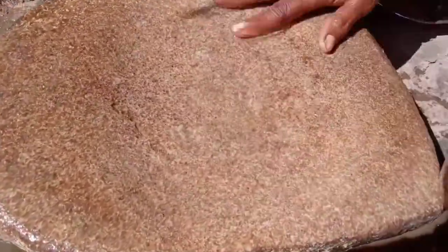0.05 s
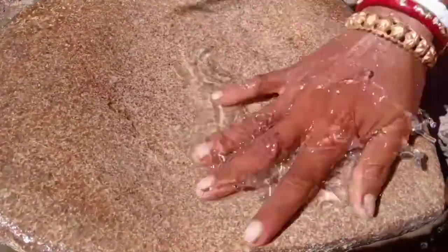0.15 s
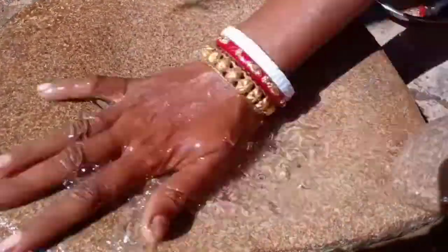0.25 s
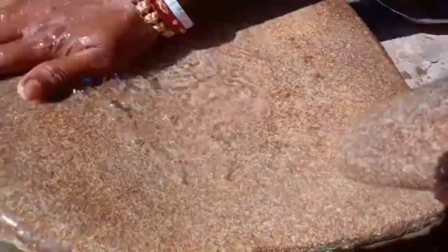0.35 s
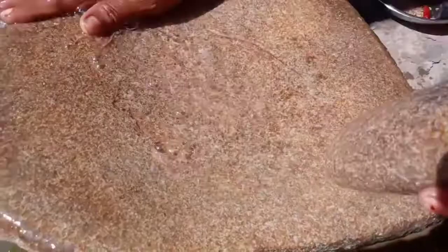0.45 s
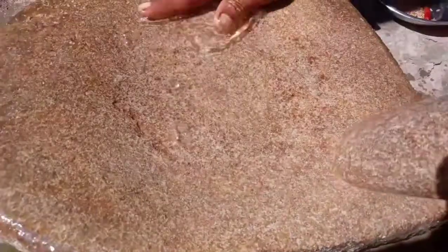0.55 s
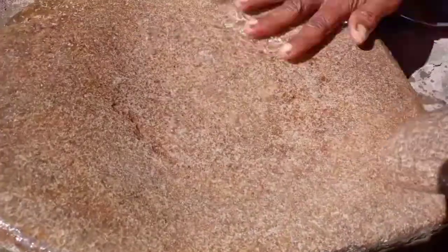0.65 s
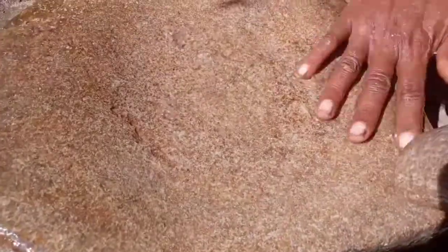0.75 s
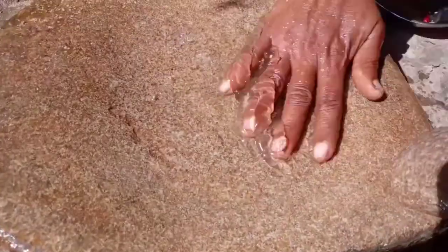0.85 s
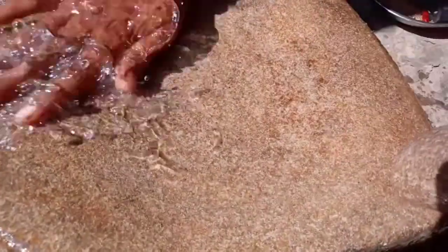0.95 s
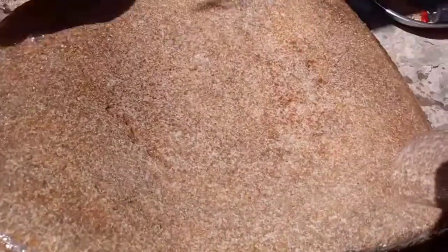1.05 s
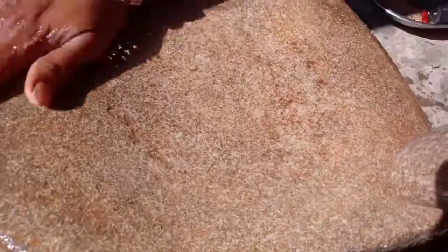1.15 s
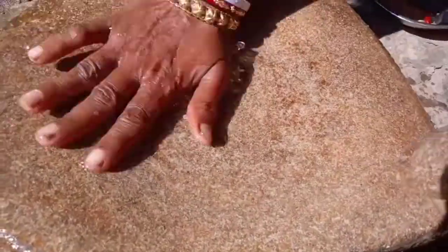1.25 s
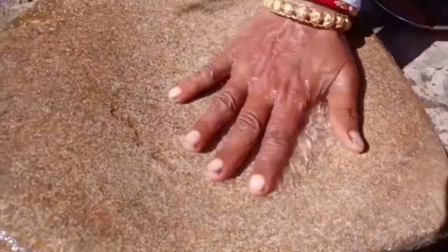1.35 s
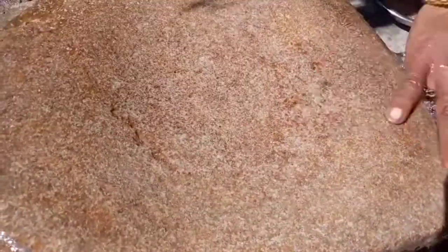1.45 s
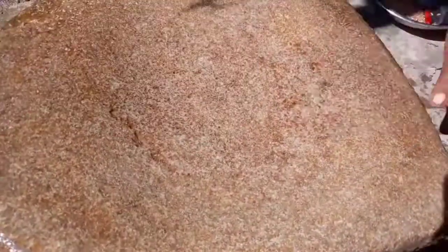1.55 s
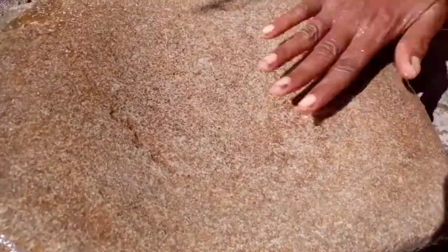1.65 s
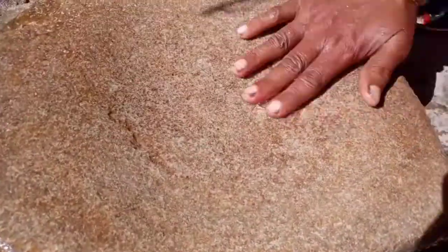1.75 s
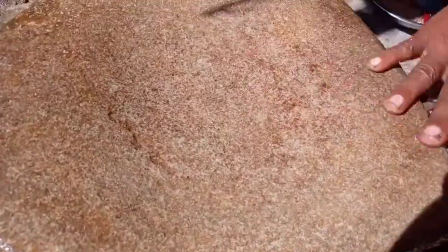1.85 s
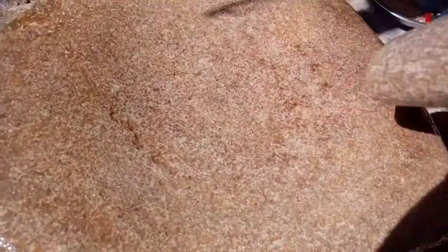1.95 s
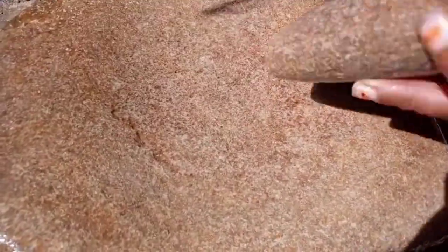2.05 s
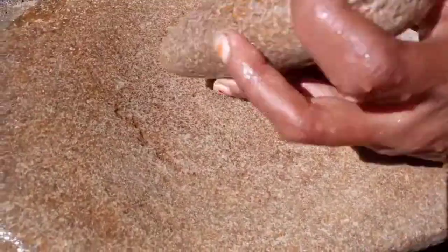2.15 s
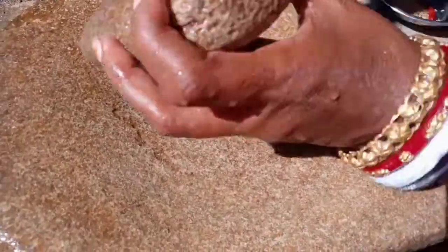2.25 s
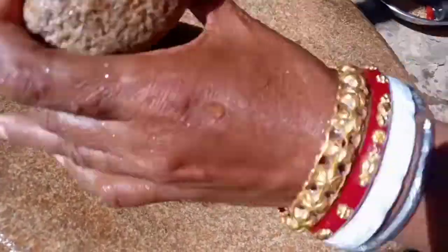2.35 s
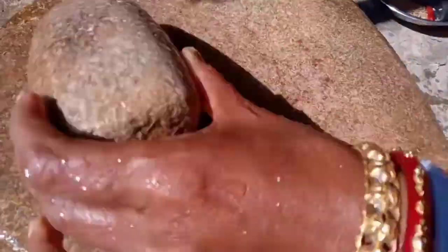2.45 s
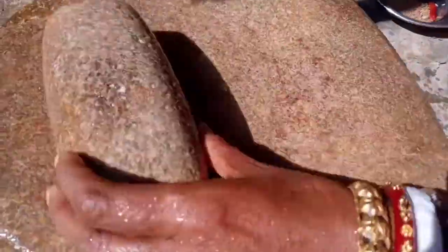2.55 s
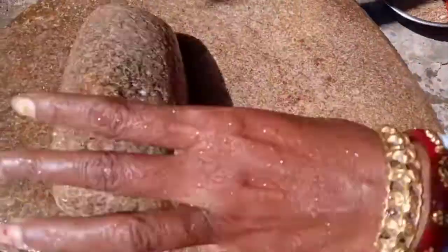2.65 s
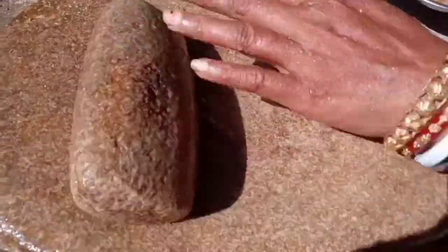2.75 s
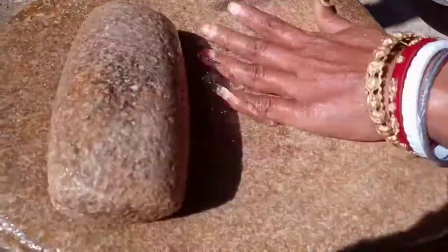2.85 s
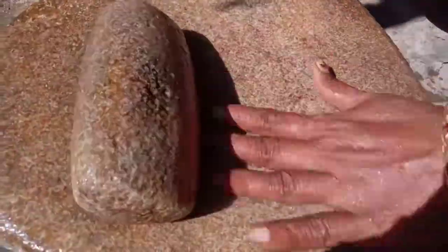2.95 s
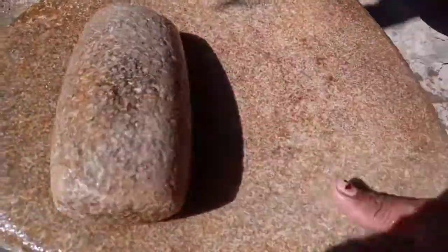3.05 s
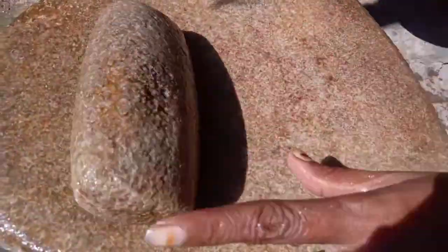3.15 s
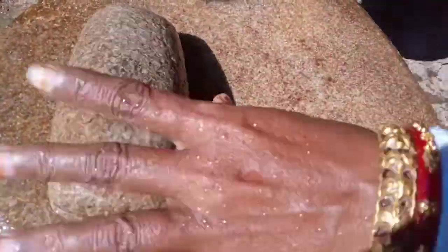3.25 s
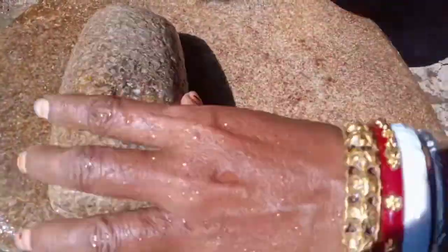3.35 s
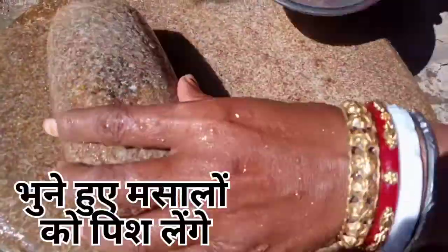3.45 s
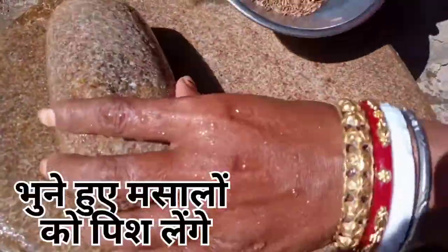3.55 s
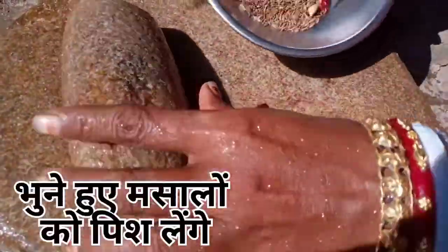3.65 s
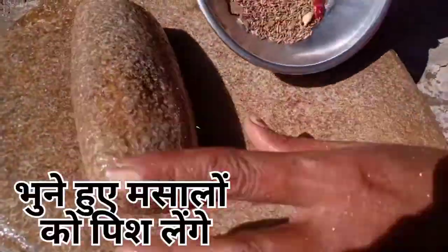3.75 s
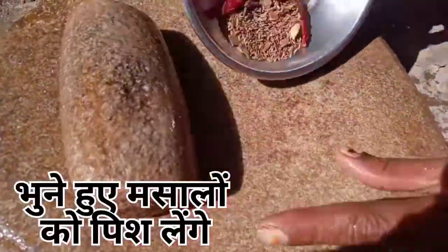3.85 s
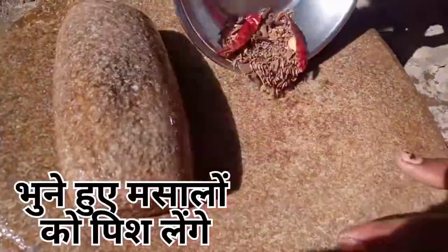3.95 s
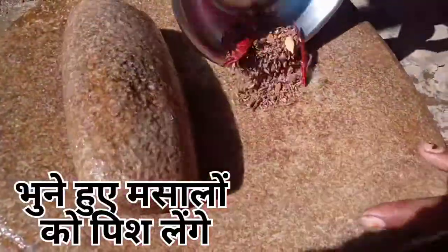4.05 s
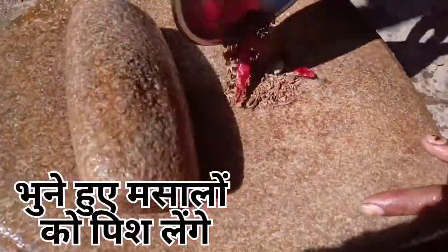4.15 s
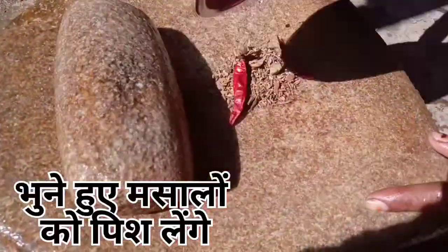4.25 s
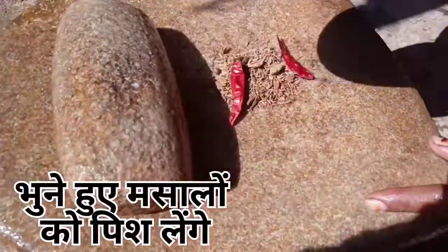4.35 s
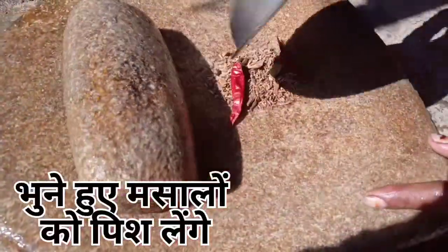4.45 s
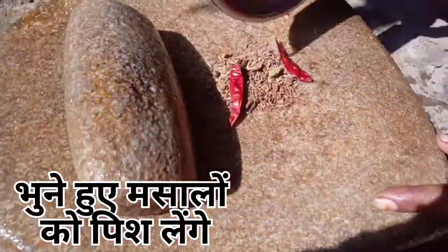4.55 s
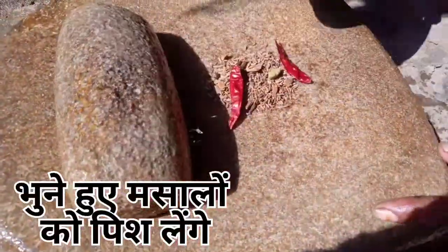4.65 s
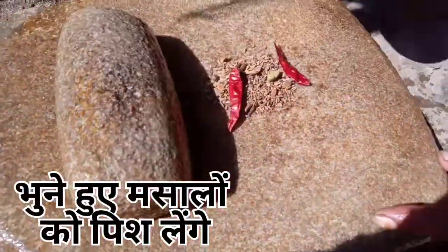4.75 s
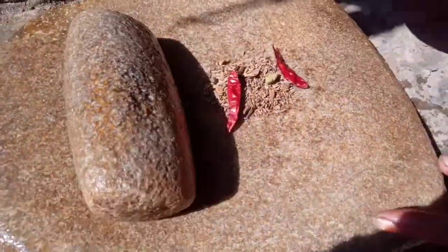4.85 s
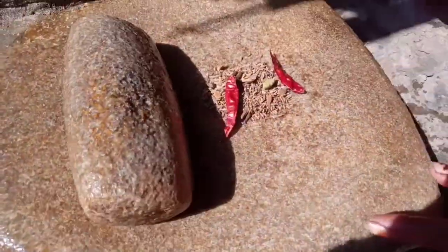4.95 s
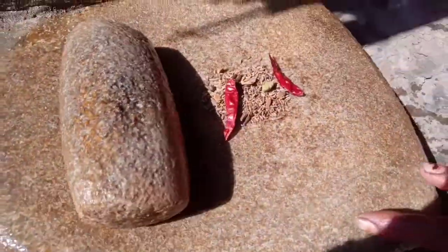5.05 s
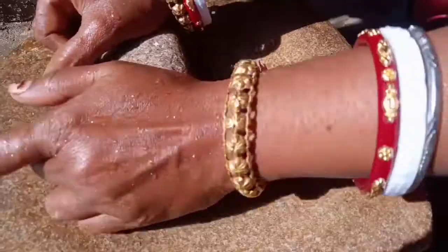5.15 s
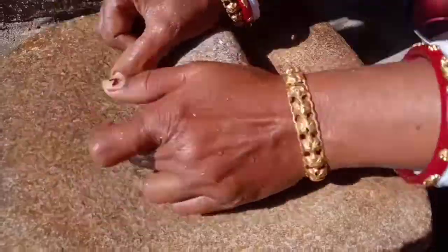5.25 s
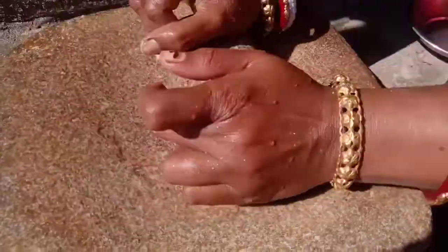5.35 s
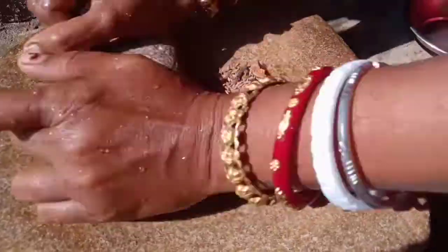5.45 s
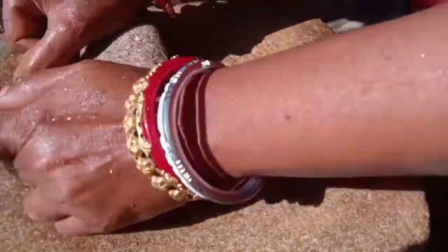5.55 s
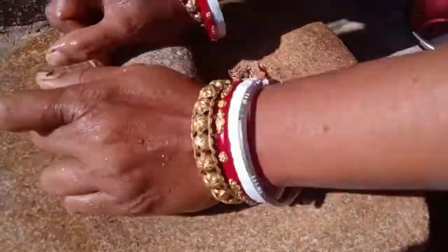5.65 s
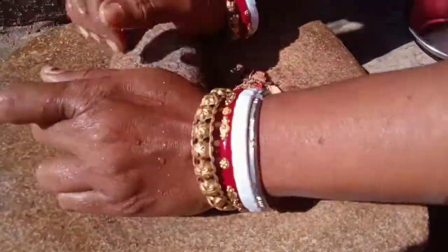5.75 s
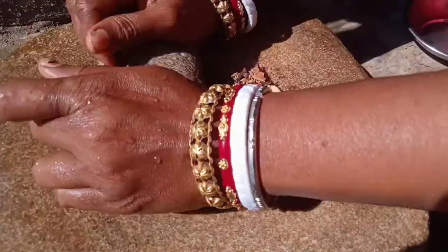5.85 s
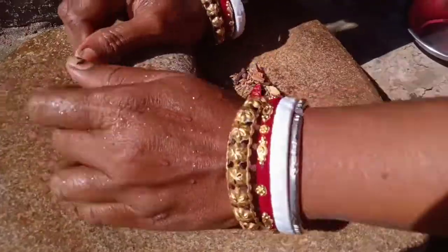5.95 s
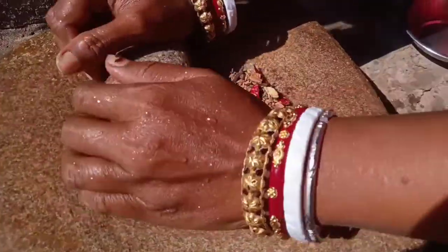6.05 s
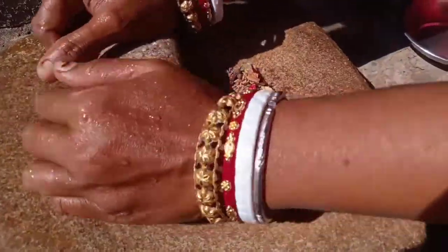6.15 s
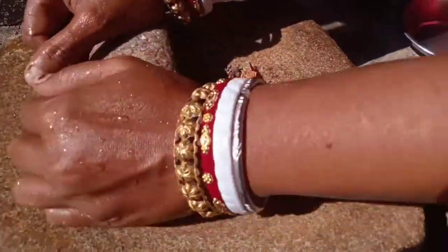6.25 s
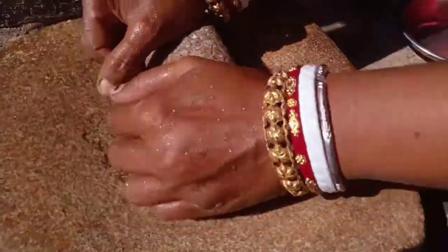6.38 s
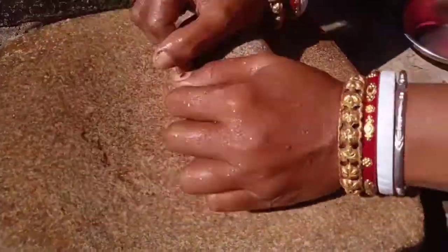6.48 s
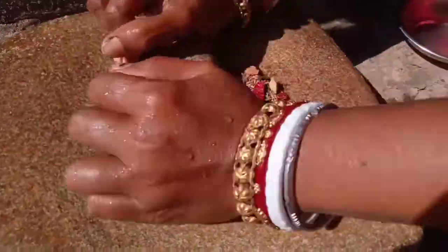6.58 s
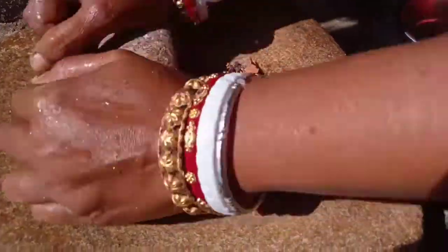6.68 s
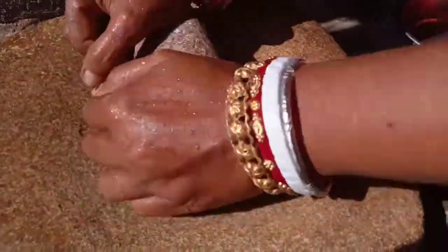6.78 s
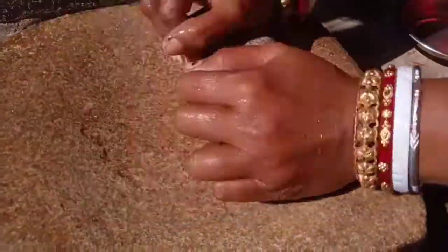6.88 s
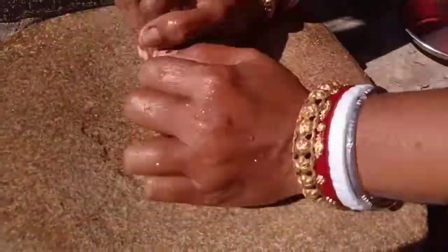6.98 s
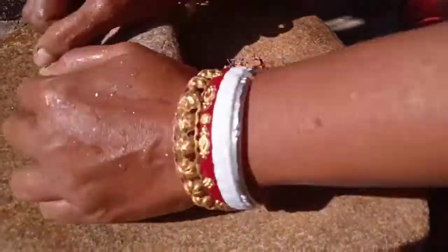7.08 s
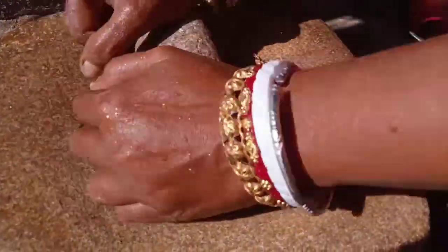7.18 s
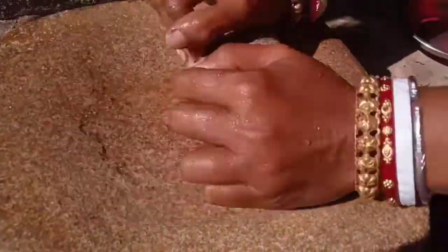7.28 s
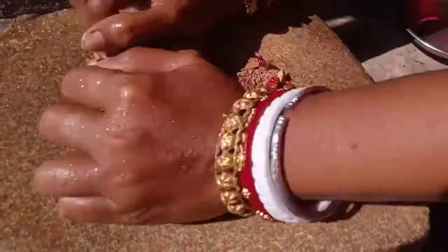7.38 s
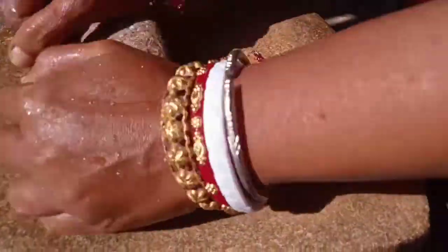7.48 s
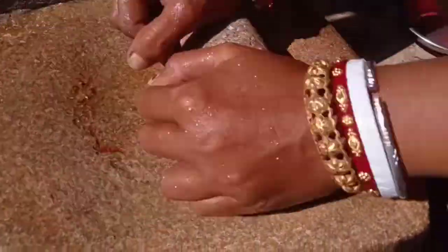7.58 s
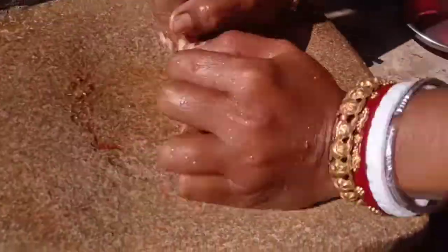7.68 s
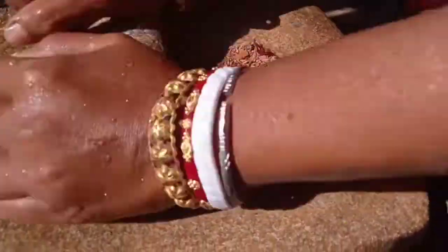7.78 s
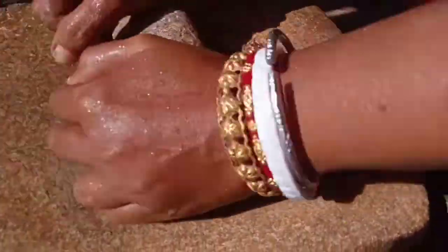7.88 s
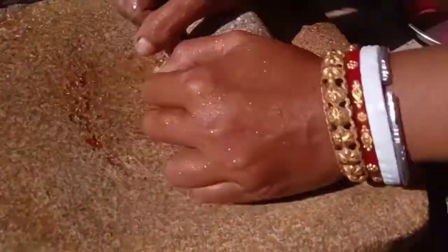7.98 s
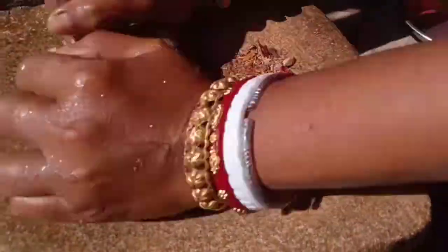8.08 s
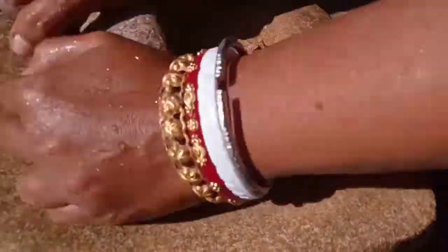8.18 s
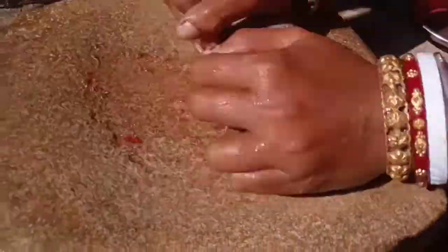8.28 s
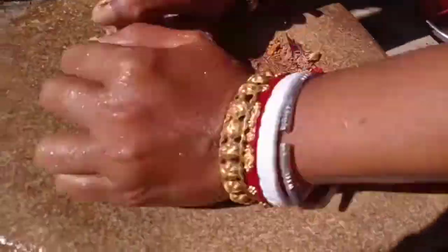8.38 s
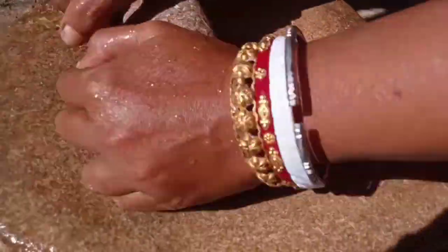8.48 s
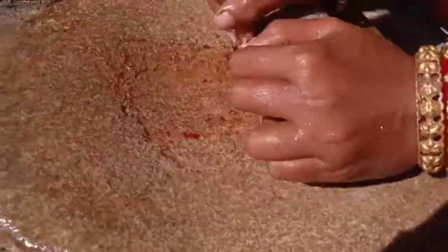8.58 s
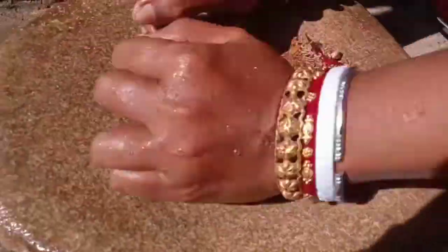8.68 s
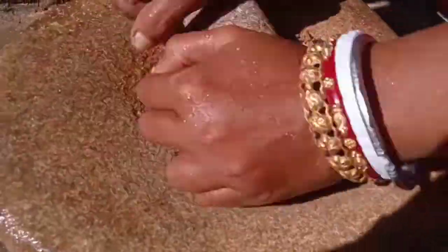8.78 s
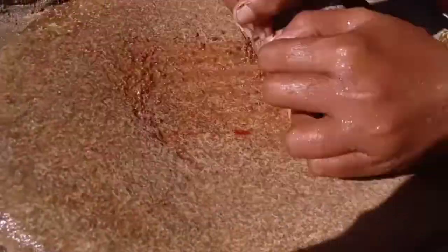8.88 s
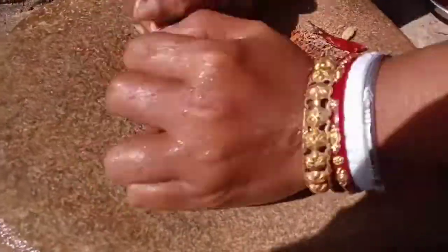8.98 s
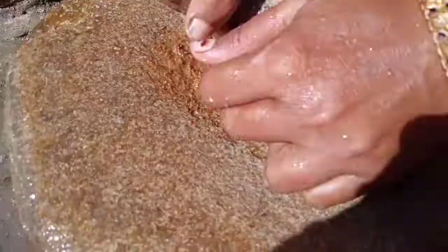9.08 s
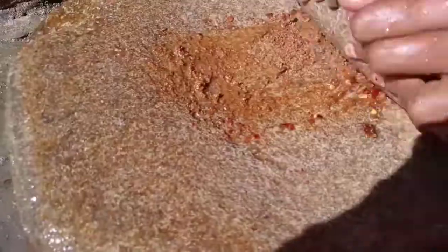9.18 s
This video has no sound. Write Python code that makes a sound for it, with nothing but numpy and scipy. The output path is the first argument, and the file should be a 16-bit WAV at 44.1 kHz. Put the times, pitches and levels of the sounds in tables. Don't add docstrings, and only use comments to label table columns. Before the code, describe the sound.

Bangles clink as a wet hand wipes a stone slab, spices tick from a steel bowl, then a stone roller scrapes and crunches.

```python
import sys
import numpy as np
from scipy import signal
from scipy.fft import rfft, irfft
from scipy.io import wavfile
from scipy.ndimage import uniform_filter1d

SR = 44100
rng = np.random.default_rng(int(sys.argv[2]) if len(sys.argv) > 2 else 0)


def materialize(psi):
    bounded = np.clip(np.atleast_2d(psi).T, -1, 1)
    quanta = np.round(bounded * 32767).astype(np.int16)
    wavfile.write(sys.argv[1], SR, quanta)


def decibels_to_gain(level_db):
    exponent = np.asarray(level_db, float) / 20
    return 10 ** exponent


N = 406602

# start_s, length_s, scrape_db, crunch_db, rattle_db
WIPES = [(0, 2.4, -65.5, -60, -65), (.09, 0.14, -54.5, -54, -56), (.2, 0.15, -55, -46, -55.5),
         (.362, 0.16, -53.5, -40, -41.5), (.59, 0.01, -50, -66, -71), (.862, 0.16, -52, -43.5, -49),
         (1.065, 0.031, -63, -38, -34), (1.132, 0.015, -44.5, -38, -35), (1.198, 0.02, -64, -37, -40),
         (1.24, 0.16, -59.5, -51, -61), (1.4, 0.2, -66, -55, -71), (1.78, 0.13, -71, -57.5, -75),
         (2.304, 0.017, -38, -44, -54), (2.42, 0.064, -57, -53.5, -55), (2.535, 0.019, -46, -48, -59),
         (2.59, 0.12, -54, -60.5, -59.5), (2.77, 0.087, -49, -68, -68), (2.803, 0.19, -52.5, -46.5, -52),
         (3.0, 1.1, -65.5, -77, -77), (3.12, 0.02, -67, -68, -48), (3.36, 0.049, -57, -65, -73)]
# pitch_hz, level_db (per Hz)
GRIT = [(150, 3), (250, -10), (392, -10.5), (857, 2.5), (1490, 3.5), (1870, 5), (2110, -4), (3320, 10.5),
        (6300, -8), (7760, 5.5), (10200, -12), (11400, -8), (15800, -11.5)]
# pitch_hz, width_hz, level_db
SLAB_RINGS = [(770, 60, -9), (863, 35, 1), (1058, 45, 1), (1900, 110, -9), (2200, 50, -18)]
# pitch_hz, width_hz, level_db
SLAB_BROAD = [(940, 420, 0), (1950, 500, 0)]
# pitch_hz, level_db, t60_s
BANGLES = [(6020, -12, .05), (7100, -4, .07), (7800, 0, .05), (8080, -4, .05), (8850, -12, .05),
           (9530, -6, .06), (10400, -10, .05), (11200, -9, .05), (12730, -8, .06), (13410, -10, .05),
           (14930, -10, .05)]
# pitch_hz, level_db, t60_s
WIDE_BANGLES = [(2650, -8, .04), (2950, -4, .04), (3330, 0, .05), (3750, -2, .04), (4200, -6, .04),
                (4950, -12, .05)]


def rubbing():
    wiping = strokes(WIPES, fall_db=354, swell_db=4, drift_db=[-5, -11.5, -10])
    scrape, crunch, rattle = wiping + grinding()
    grit = grains(2500, 2.8) * decibels_to_gain(2.7 * walk(70))
    shake = grains(6000, 2.0) * jolts(140, fade_s=.009, steady=1.1)

    bare = np.interp(np.arange(N) / SR, [5.0, 5.1, 5.4, 8.0], [.5, .98, .75, .45])
    dull = unit(band(colour(grit, GRIT), 691, 2165))
    ringing = unit(resonate(resonate(grit, SLAB_BROAD, 0), SLAB_RINGS, 2))
    stone = np.sqrt(np.clip(1 - bare ** 2, 0, 1)) * dull + bare * ringing
    stone += 1.24 * (1 - bare) ** 2 * unit(band(grit, 453, 786))

    seeds = patchy(colour(grit + shake, GRIT), 1650, 4800)
    seeds += 0.5 * unit(resonate(shake, as_peaks(WIDE_BANGLES), 5))
    jingle = patchy(colour(shake, GRIT), 4790, 22000)
    jingle += 0.43 * unit(resonate(shake, as_peaks(BANGLES), 4.5))
    return scrape * band(stone, 332, 2870) + crunch * (unit(seeds) + 0.2 * splash()) + rattle * unit(jingle)


# start_s, length_s, scrape_db, crunch_db, rattle_db
PUSHES = [(5.127, 0.13, -29.5, -46.5, -53.5), (5.262, 0.039, -74, -35, -36), (5.436, 0.03, -40, -55, -55),
          (5.345, 0.07, -41.5, -33.5, -34), (5.47, 0.13, -49, -40, -37), (5.62, 0.24, -60.5, -58, -55.5),
          (5.86, 0.016, -51, -44.5, -41.5), (6.525, 0.12, -38, -37.5, -32), (6.915, 0.12, -36.5, -32, -31),
          (7.265, 0.17, -37, -34, -33.5), (7.655, 0.14, -41.5, -36, -37), (8.025, 0.093, -41, -33.5, -29),
          (8.42, 0.18, -47, -38, -38.5), (8.62, 0.12, -45, -37.5, -35.5), (8.918, 0.17, -47, -35, -34.5),
          (9.203, 0.021, -44, -32.5, -31)]
PULLS = [
    (6.06, 0.17, -52.5, -47.5, -47),
    (7.13, 0.15, -43.5, -39, -45),
    (7.49, 0.23, -44.5, -36, -43),
    (7.85, 0.19, -51, -38.5, -40),
    (8.17, 0.15, -47, -35, -35.5),
    (8.32, 0.15, -43, -39.5, -37.5),
    (8.765, 0.19, -46, -41.5, -42.5),
    (9.1, 0.11, -62, -44.5, -45),
]
DRAGS = [
    (6.265, 0.24, -35, -45.5, -51),
    (6.725, 0.2, -40, -41.5, -49),
]


def grinding():
    forward = strokes(PUSHES, fall_db=277, swell_db=4, drift_db=[8.5, -1.5, -5.5])
    back = strokes(PULLS, fall_db=303, swell_db=8, drift_db=[-18.5, 3, 11])
    return forward + back + strokes(DRAGS, fall_db=358, swell_db=13, drift_db=[-2.5, 22, 26])


def strokes(table, fall_db, swell_db, drift_db):
    out = np.zeros((3, N))
    for start_s, length_s, *levels_db in table:
        size = min(int((length_s + .3) * SR), N - int(start_s * SR))
        t = np.arange(size) / SR
        edge = np.minimum(t / .014, 1) ** 2 * decibels_to_gain(-fall_db * np.maximum(t - length_s, 0))
        along = np.minimum(t / length_s, 1) - .5
        level_db = np.c_[levels_db] + np.c_[drift_db] * along - swell_db * (2 * along) ** 2
        add(out.T, start_s, (edge * decibels_to_gain(level_db)).T)
    return out


# start_s, peak_db, bottom_hz, top_hz, thump_db
CRACKS = [
    (5.4383, -7, 770, 2650, -61),
    (7.767, -7.5, 583, 3700, -35),
    (8.121, -10.5, 600, 3900, -41),
    (8.429, -11, 1340, 3220, -42),
]


def cracks():
    out, t = np.zeros(N), np.arange(3000) / SR
    for start_s, peak_db, bottom_hz, top_hz, thump_db in CRACKS:
        push = grains(4800, 0.52, size=len(t)) * decay(t, 0.06)
        push[0] += 12
        modes = [(hz, db, .015) for hz, _, db in SLAB_RINGS if hz > bottom_hz]
        body = unit(band(push, bottom_hz, top_hz)) + 0.13 * struck(push, modes, 5.3)
        thump = band(push, 160, 640)
        add(out, start_s, peak_at(body, peak_db + 2) + peak_at(thump, thump_db + 6.0))
    return out


# start_s, peak_db, ring_hz (strongest), thump_db
KNOCKS = [(0.452, -18, 1240, -25.5), (0.594, -39.5, 800, -48), (0.762, -31.5, 790, -30),
          (2.312, -24, 740, -28.5), (2.328, -31.5, 910, -35), (2.561, -29, 860, -37.5),
          (2.663, -32, 830, -73), (2.705, -41.5, 810, -53), (2.927, -28, 2410, -58),
          (3.617, -40.5, 980, -45), (4.202, -40.5, 860, -43.5), (5.134, -28, 1090, -45),
          (5.201, -22.5, 1050, -54), (5.489, -43, 1300, -59), (5.548, -29, 885, -54),
          (5.555, -33, 855, -56), (7.768, -22.5, 720, -42), (3.42, -51, 800, -51), (3.045, -52, 764, -56),
          (2.339, -35, 1320, -42), (2.627, -42.5, 895, -66), (2.65, -39, 804, -67), (2.684, -54, 900, -45),
          (2.783, -37, 900, -55), (4.121, -49, 900, -53), (0.604, -40, 1610, -53), (6.319, -32.5, 920, -41),
          (6.351, -27, 875, -48), (6.604, -25, 1000, -40), (6.626, -28, 1080, -44), (6.643, -33, 1020, -47),
          (6.403, -23.5, 1820, -47), (6.586, -28.5, 885, -41), (6.811, -25, 1820, -37.5),
          (6.829, -27, 1050, -35.5), (6.996, -34, 990, -54), (7.017, -24.5, 974, -41),
          (7.139, -27.5, 1440, -40.5), (7.389, -24, 890, -37), (7.498, -26.5, 840, -35.5),
          (8.489, -35, 760, -39)]


def knocks():
    out, t = np.zeros(N), np.arange(3000) / SR
    for start_s, peak_db, ring_hz, thump_db in KNOCKS:
        push = .25 * rng.standard_normal(len(t)) * decay(t, .025)
        push[0] += 4
        modes = [(ring_hz, 3, .02)] + [(hz, db, .015) for hz, _, db in SLAB_RINGS[:3]]
        body = 1.54 * struck(push, modes, 1.0)
        body += 0.37 * unit(band(push, 0.5 * ring_hz, 2.0 * ring_hz))
        body = band(body, .5 * ring_hz, 2900)
        thump = band(push, 147, 857)
        add(out, start_s, peak_at(body, peak_db + 5.5) + peak_at(thump, thump_db + 8.5))
    return out


# start_s, peak_db, low_db (lower ring), ring_hz (strongest), t60_s (flurry)
STROKE_CLACKS = [(5.134, -60, -60, 2010, 0.014), (6.907, -28, -28.5, 3320, 0.049),
                 (7.295, -24, -29.5, 3860, 0.026), (7.34, -32, -29, 7600, 0.032),
                 (5.3426, -29.5, -28.5, 3160, 0.19), (5.457, -30, -41, 8900, 0.034),
                 (5.526, -17.5, -28.5, 8240, 0.18), (5.5635, -18.5, -44, 8100, 0.065),
                 (5.718, -28, -43, 7200, 0.031), (6.448, -37, -31, 3290, 0.097),
                 (6.538, -28, -26.5, 3230, 0.018), (6.55, -19, -23, 3380, 0.086),
                 (6.576, -25.5, -32, 8000, 0.049), (6.598, -22, -45, 8000, 0.024),
                 (6.695, -28, -36, 3670, 0.072), (8.065, -18.5, -39, 8200, 0.043),
                 (8.324, -26.5, -33.5, 3760, 0.041), (8.349, -22, -29.5, 7250, 0.14),
                 (8.492, -41, -33, 3670, 0.023), (8.727, -25.5, -40, 7900, 0.023),
                 (8.819, -49, -29, 3300, 0.039), (6.656, -14.5, -61, 8230, 0.05),
                 (7.057, -11.5, -29, 7960, 0.071), (7.1036, -22, -29, 8500, 0.086),
                 (7.43, -14, -34, 7650, 0.058), (7.671, -22.5, -29, 3290, 0.092),
                 (7.69, -16.5, -30, 7900, 0.05), (7.747, -31, -29, 3170, .02),
                 (8.0334, -35, -32, 3400, 0.037), (8.9314, -24, -24, 3730, 0.057),
                 (8.6304, -27.5, -30.5, 3940, .02), (7.7934, -11, -28, 8120, 0.072),
                 (8.14, -11.5, -27, 8140, 0.052), (8.155, -13, -43, 7960, 0.018),
                 (8.4347, -17.5, -38, 8260, 0.062), (8.6473, -21, -29, 7600, 0.038),
                 (9.029, -14.5, -35, 7660, 0.078)]
LOOSE_CLACKS = [(0.1612, -21, -30.5, 3420, 0.038), (.131, -44, -57, 7000, .012),
                (0.202, -48, -48, 9000, .015), (0.227, -32.5, -44, 3300, 0.025),
                (.255, -35, -34, 3440, 0.013), (0.3823, -26, -33, 8330, 0.065),
                (0.4, -29, -30.5, 7600, .02), (0.4252, -35, -29, 3200, 0.032),
                (0.4745, -35, -33, 3300, 0.03), (.912, -24, -29.5, 7500, 0.052),
                (1.023, -44, -50, 5570, .012), (1.112, -38, -52, 7710, 0.028),
                (.615, -58, -37.5, 2950, 0.018), (.6515, -54, -56, 4010, .015),
                (.8884, -33, -36, 2580, 0.055), (1.0124, -50, -32.5, 3320, 0.02),
                (1.14, -31, -33, 8070, 0.02), (2.652, -33.5, -47, 7700, 0.017),
                (2.96, -35, -40, 6950, 0.0079), (3, -44, -60, 9700, 0.012), (3.752, -42, -60, 8010, .012),
                (4.498, -58, -51, 3420, .012), (4.1838, -43, -40, 3980, 0.041),
                (4.229, -43, -48, 8000, 0.0092), (0.504, -32, -28.5, 4180, 0.033),
                (0.762, -46.5, -37, 7200, 0.032), (0.95, -21.5, -29, 11000, 0.033),
                (0.9776, -26.5, -23.5, 3440, 0.025), (1.0763, -37, -32.5, 3490, 0.011),
                (1.158, -26, -20.5, 3830, 0.014), (1.168, -22, -29.5, 4050, 0.05),
                (1.2426, -27, -27.5, 3010, 0.048), (1.2879, -37, -33, 2870, 0.092),
                (2.299, -34.5, -43, 7800, 0.018), (2.538, -39.5, -42, 3330, 0.048),
                (2.896, -27, -42, 7800, 0.025), (2.95, -37, -38, 6950, 0.014),
                (3.237, -28, -44.5, 8100, 0.027), (4.036, -38.5, -48, 5830, 0.025),
                (4.1633, -42, -43, 3900, 0.014)]
FAINT_CLACKS = [
    (1.54, -43, -62, 8000, .015),
    (1.573, -38, -41, 3440, 0.011),
    (1.707, -48, -54, 4200, .02),
    (1.925, -47, -64, 8600, .012),
    (1.991, -52, -48, 3550, .012),
    (4.296, -62, -58, 3500, .015),
]
CHIMES = [(0.3316, -37, -44, 7000, 0.027), (2.312, -34.5, -37, 6930, 0.034), (2.317, -60, -34, 2650, 0.035),
          (2.337, -60, -51, 2600, 0.02), (2.593, -43, -47, 7900, 0.033), (2.832, -26, -50, 9700, 0.044),
          (8.445, -21.5, -24, 3520, 0.027), (.612, -45.5, -72, 7010, 0.024),
          (.478, -37.5, -28.5, 4090, 0.085), (1.3, -35, -28.5, 3630, 0.028), (2.034, -51, -54, 7000, .03),
          (1.696, -40, -41, 2460, 0.044), (2.447, -49, -35, 3570, 0.029), (2.637, -33.5, -52, 11000, 0.017),
          (2.819, -25.5, -27.5, 5140, 0.044), (2.87, -26, -64, 12500, 0.049),
          (2.9237, -31, -35, 2660, 0.0087), (2.806, -37, -53, 9000, 0.035), (2.824, -50, -40, 3360, 0.09),
          (2.876, -55, -42, 3350, .09), (3.1207, -39, -51.5, 7690, 0.062), (4.106, -43, -44, 3640, 0.05),
          (5.4872, -23, -54, 7140, 0.083), (5.539, -23.5, -52, 9500, 0.044), (5.566, -53, -37, 4930, .04),
          (5.671, -30, -34, 8070, 0.011), (5.757, -38.5, -44.5, 7960, 0.047), (5.809, -63, -36, 3270, 0.04),
          (5.92, -45, -76, 6660, 0.015), (7.47, -20.5, -32, 10900, 0.058), (8.514, -23.5, -35, 9600, 0.027),
          (8.765, -29, -30, 3240, 0.057), (8.516, -40, -29, 3450, 0.023),
          (9.0582, -15.5, -36, 11700, 0.024), (9.1685, -21, -64, 9740, 0.012)]


def clinks():
    out, t = np.zeros(N), np.arange(4500) / SR
    rows = [(row, 0.3) for row in LOOSE_CLACKS + STROKE_CLACKS + FAINT_CLACKS]
    rows += [(row, 1) for row in CHIMES]
    for (start_s, peak_db, low_db, ring_hz, t60_s), share in rows:
        rise = np.minimum(t / (0.0008 + 0.018 * t60_s), 1)
        push = grains(8560, 1.88, size=len(t)) * rise * decay(t, np.clip(1.72 * t60_s, .006, .2))
        crack = colour(push, GRIT)
        lead = [(ring_hz, 9.0, .06)]
        high_modes = BANGLES + lead * (ring_hz > 5300)
        low_modes = WIDE_BANGLES + lead * (ring_hz <= 5300)
        high = unit(band(crack, 7000, 19700)) + share * struck(push, high_modes, 4)
        low = unit(band(crack, 1200, 4900)) + 3.1 * share * struck(push, low_modes, 4)
        add(out, start_s, peak_at(high, peak_db + 7.5) + peak_at(low, low_db + 5.0))
    return out


# start_s, level_db
POUR = [
    (3.667, -70),
    (3.707, -65),
    (3.836, -45.5),
    (3.936, -44.5),
    (4.056, -51.5),
    (4.2, -40.5),
    (4.32, -75),
    (4.764, -64),
    (5.098, -70),
]
# pitch_hz, width_hz, level_db
BOWL_RINGS = [(2070, 60, -10), (3015, 45, -3), (3550, 50, -13), (4500, 60, -17), (5980, 47, -3),
              (7130, 65, -2), (7450, 190, -5), (8000, 67, 0), (9540, 30, -6), (10000, 130, -10),
              (12400, 70, -11), (14400, 90, -9)]


def bowl():
    ticks = grains(3960, 0.77) * decibels_to_gain(1.0 * walk(40))
    loaded = np.interp(np.arange(N) / SR, [4.02, 4.12], [1, .15])
    steel = loaded * unit(resonate(ticks, BOWL_RINGS, 3))
    landing = .25 * unit(band(ticks, 680, 6500)) + .33 * unit(band(ticks, 6500, 18000))
    return level_line(POUR) * unit(steel + landing)


# start_s, level_db, pitch_hz (at start), glide_ratio, length_s
BUBBLES = [(0.101, -29.5, 2740, 1.03, 0.018), (0.214, -25.5, 1720, 1.43, 0.012),
           (0.884, -39, 1014, 1.7, 0.033), (0.896, -33, 967, 1.54, 0.039), (0.099, -31.5, 1900, 3.1, 0.017),
           (0.096, -45, 810, 1.3, .03), (0.251, -35.5, 2790, 1.26, 0.013), (.268, -38, 1610, 1.5, 0.027),
           (0.267, -39, 3530, 1.15, .012), (0.27, -36, 5400, 1.2, 0.0069), (0.316, -41, 2100, 1.3, 0.016),
           (0.411, -36, 4530, 1.3, .012), (0.439, -27, 2955, 1.25, 0.021), (0.925, -35.5, 807, 1.7, 0.024),
           (0.964, -37, 1350, 1.25, 0.019), (0.891, -34, 2210, 1.1, 0.0097), (0.93, -35, 1416, 1.2, 0.054),
           (1.002, -32.5, 888, 1.38, 0.017), (1.011, -35.5, 1070, 1.62, 0.0157),
           (1.692, -38, 2280, 1.3, 0.02), (1.769, -49, 1970, 1.3, 0.045)]


def bubbles():
    out = np.zeros(N)
    for start_s, level_db, pitch_hz, glide, length_s in BUBBLES:
        add(out, start_s, decibels_to_gain(level_db) * chirp(pitch_hz, glide, length_s))
    return out * decibels_to_gain(4.2 * walk(570) - 1.0)


def splash():
    out, wet_s = np.zeros(N), 1.45
    for when, size, big in rng.random((450, 3)):
        hz = 1900 * 2.5 ** size
        add(out, when * wet_s, 3 * big ** 2 * chirp(hz, 1.12, 28 / hz))
    return out


def chirp(hz, glide, length_s):
    u = np.arange(int(length_s * SR)) / SR / length_s
    return np.minimum(u / 0.19, 1) * (1 - u) * np.sin(2 * np.pi * np.cumsum(hz * glide ** u) / SR)


# start_s, level_db
RUMBLE = [
    (0.0, -54.5),
    (0.82, -54.5),
    (1.69, -58.5),
    (2.26, -58.5),
    (5.06, -63),
    (6.2, -66.5),
    (9.22, -54.5),
]
# pitch_hz, level_db (per Hz)
HUM = [(12, -67), (20, -37), (38, -21), (124, 0), (204, -3.5), (320, -11), (420, -16.5), (700, -120)]
# pitch_hz, level_db (per Hz)
YARD = [(150, 2.5), (250, -10), (527, -0.5), (660, -4), (746, -3), (2430, -8), (3680, -6.5), (5300, -21),
        (7760, -10.5), (9720, -28), (15800, -22)]


def yard():
    t = np.arange(N) / SR
    hiss = decibels_to_gain(-59.5 + 1.0 * walk(2.68)) * unit(colour(rng.standard_normal(N), YARD))
    crunch = grinding()[1]
    rock = decibels_to_gain(-31) * uniform_filter1d(crunch, size=1500) ** 0.66
    hum = unit(colour(rng.standard_normal(N), HUM + [(500, -53.0)]))
    rumble = (level_line(RUMBLE) + rock) * decibels_to_gain(2.5 * walk(14)) * hum
    swell = np.clip(np.minimum(t - 1.45, 1.7 - t) / 0.024, 0, 1)
    pitch_hz = 272 * (1 + 0.0162 * walk(11))
    coo = decibels_to_gain(-61) * swell * np.sin(2 * np.pi * np.cumsum(pitch_hz) / SR)
    return hiss + rumble + coo


def band(x, lo_hz, hi_hz):
    return signal.sosfilt(signal.butter(3, [lo_hz, hi_hz], "band", fs=SR, output="sos"), x)


def unit(x):
    return x / np.sqrt(np.mean(x ** 2))


def peak_at(x, db):
    return x * decibels_to_gain(db) / np.abs(x).max()


def decay(t, t60_s):
    return 1000. ** (-t / t60_s)


def add(out, start_s, x):
    i = int(start_s * SR)
    out[i:i + len(x)] += x[:len(out) - i]


def level_line(table):
    s, db = np.transpose(table)
    return decibels_to_gain(np.interp(np.arange(N) / SR, s, db, -200, -200))


def colour(x, table):
    hz, db = np.transpose(table)
    size = 4096
    bins_hz = np.arange(size // 2 + 1) * SR / size
    cep = irfft(np.log(decibels_to_gain(np.interp(np.log(bins_hz + 1), np.log(hz), db))))
    cep[1:size // 2] *= 2
    cep[size // 2:] = 0
    return signal.oaconvolve(x, irfft(np.exp(rfft(cep)))[:size // 2])[:len(x)]


def resonate(x, peaks, wander_db):
    out = 0
    for hz, width_hz, db in peaks:
        drive = x * decibels_to_gain(db + wander_db * walk(25))
        out = out + signal.lfilter(*signal.iirpeak(hz, hz / width_hz, SR), drive)
    return out


def as_peaks(modes):
    return [(hz, np.log(1000) / np.pi / t60_s, db) for hz, db, t60_s in modes]


def struck(push, modes, scatter_db):
    t = np.arange(len(push)) / SR
    ring = 0
    for hz, db, t60_s in modes:
        strength, detune = rng.standard_normal(2)
        tone = np.sin(2 * np.pi * hz * (1 + 0.0056 * detune) * t)
        ring = ring + decibels_to_gain(db + scatter_db * strength) * tone * decay(t, t60_s)
    return unit(signal.fftconvolve(push, ring)[:len(push)])


def grains(rate, spread_db, size=N):
    hit, sign, big = rng.random(size), rng.standard_normal(size), rng.exponential(size=size)
    click = np.clip((rate / SR - hit) * SR / 300 + .5, 0, 1)
    return unit(click * sign * decibels_to_gain(spread_db * np.minimum(big, 5)))


def walk(rate):
    k = int(SR / rate)
    return uniform_filter1d(np.repeat(rng.standard_normal(N // k + 1), k), k)[:N]


def jolts(rate, fade_s, steady):
    slips = (rng.random(N) < rate / SR) * rng.exponential(size=N) ** .5
    return steady + signal.lfilter([1], [1, -np.exp(-1 / (fade_s * SR))], slips)


def patchy(x, lo_hz, hi_hz):
    edges = np.geomspace(lo_hz, hi_hz, 6)
    out = 0
    for k in range(5):
        out = out + (-1) ** k * decibels_to_gain(3.8 * walk(45)) * band(x, edges[k], edges[k + 1])
    return unit(out)


def scene():
    mid = rubbing() + cracks() + knocks() + clinks() + bowl() + bubbles() + yard()
    hard = np.clip(uniform_filter1d(np.abs(mid), 600) / decibels_to_gain(-33) - 1, 0, 1)
    side = decibels_to_gain(-15) * band(hard * mid * np.sign(walk(4000)), 5000, 15800)
    return np.array([mid + side, mid - side])


def top_cut(x):
    return signal.sosfilt(signal.butter(12, 16980, fs=SR, output="sos"), x)


def record(dry):
    thin = signal.sosfilt(signal.butter(2, 45, "high", fs=SR, output="sos"), dry)
    mid = thin.mean(axis=0)
    rounded = thin - mid + .9 * np.tanh(mid / .9)
    shelf = signal.ellip(8, .2, 30, 15930, fs=SR, output="sos")
    return top_cut(signal.sosfilt(shelf, rounded))


dry = scene()
out = record(dry)
materialize(out)
```